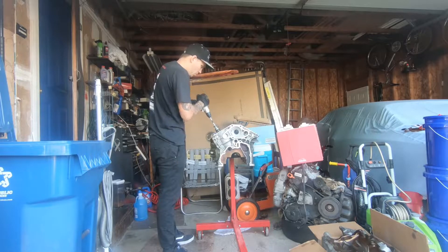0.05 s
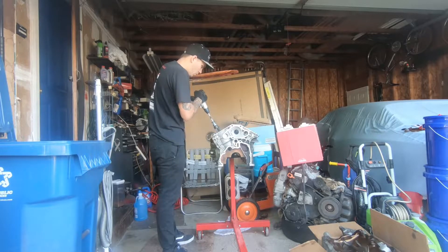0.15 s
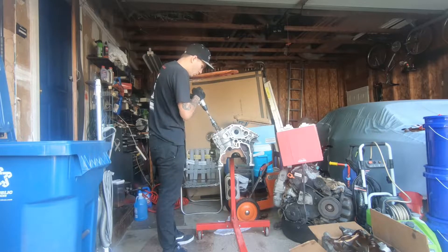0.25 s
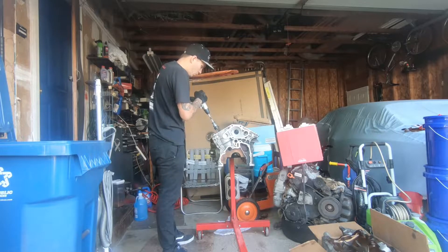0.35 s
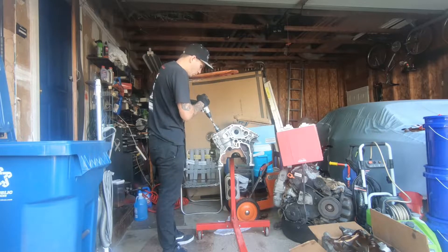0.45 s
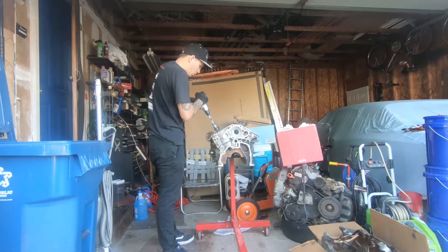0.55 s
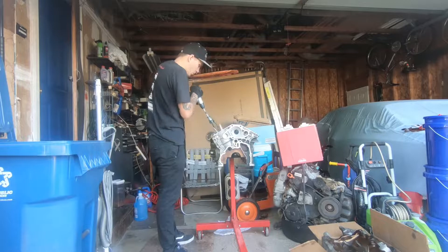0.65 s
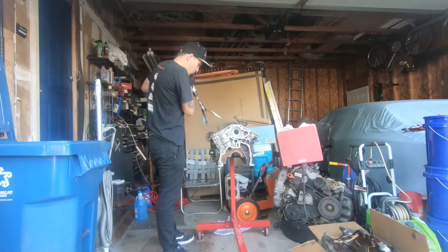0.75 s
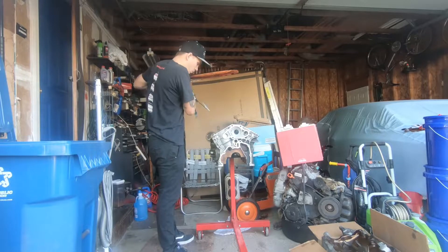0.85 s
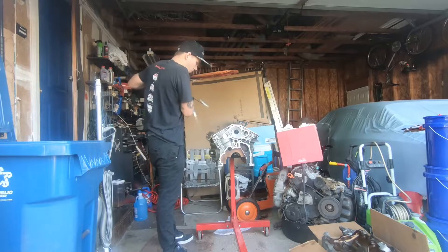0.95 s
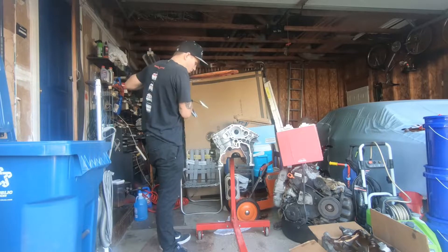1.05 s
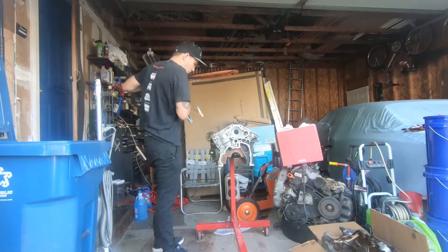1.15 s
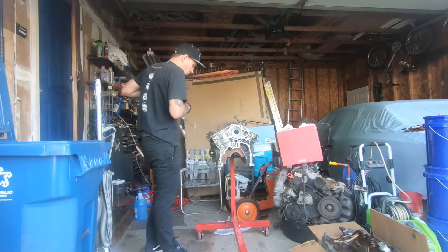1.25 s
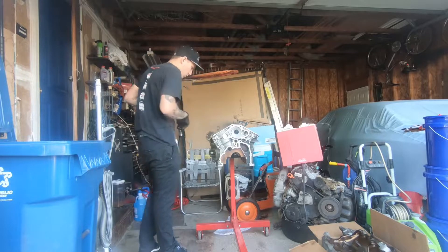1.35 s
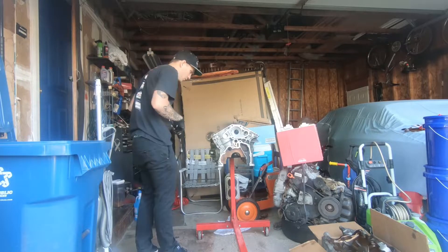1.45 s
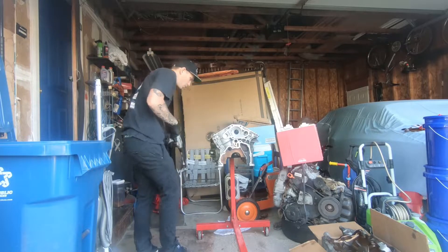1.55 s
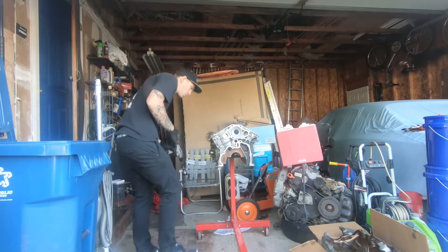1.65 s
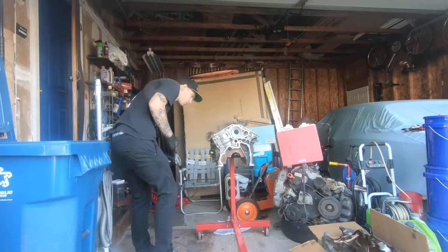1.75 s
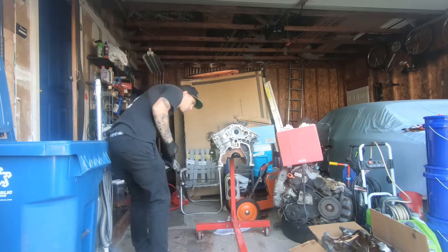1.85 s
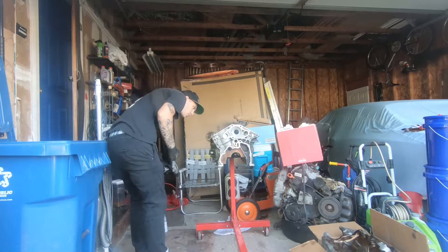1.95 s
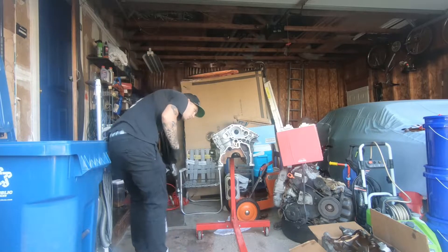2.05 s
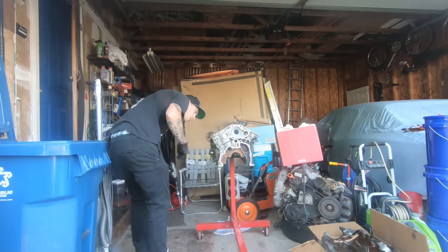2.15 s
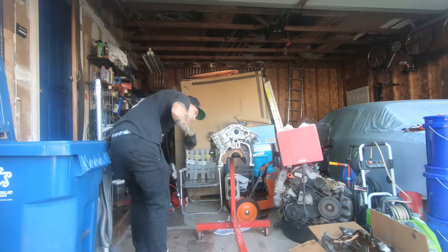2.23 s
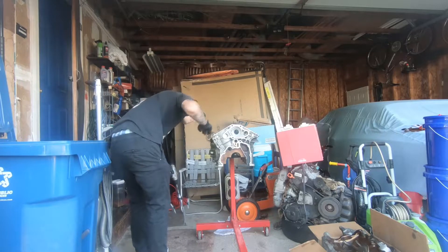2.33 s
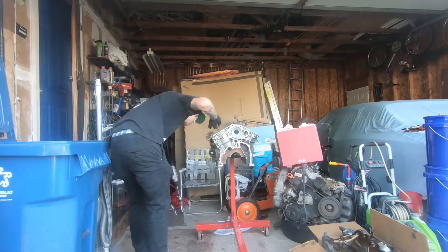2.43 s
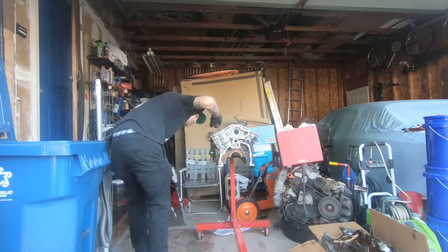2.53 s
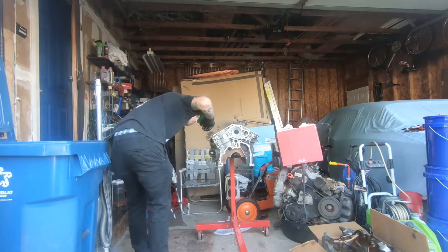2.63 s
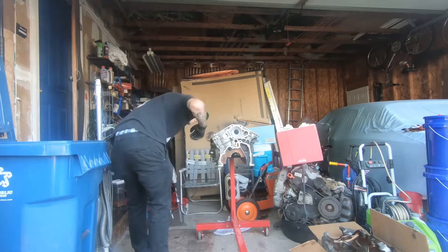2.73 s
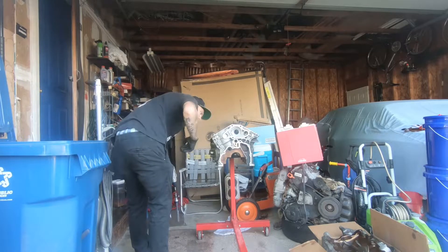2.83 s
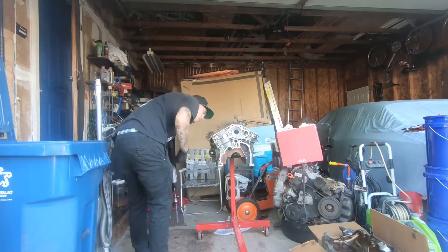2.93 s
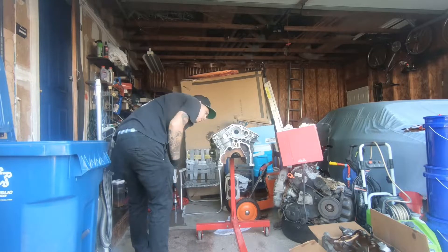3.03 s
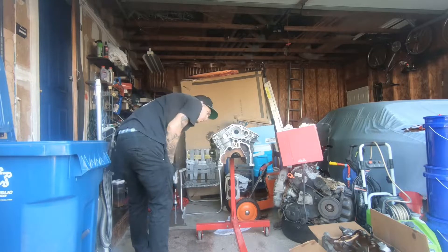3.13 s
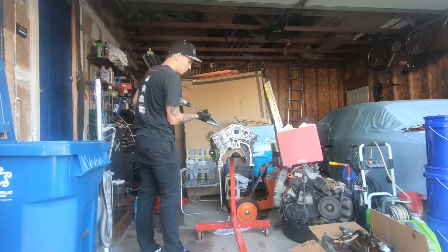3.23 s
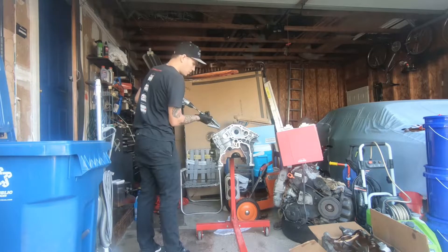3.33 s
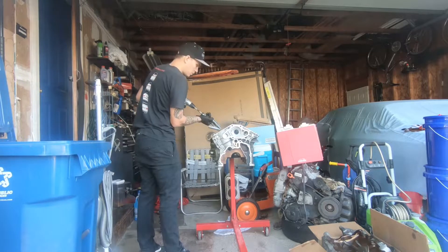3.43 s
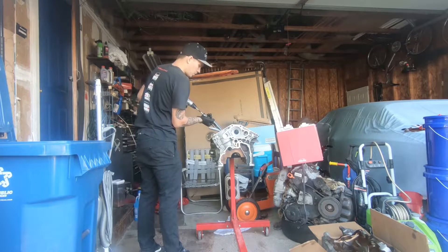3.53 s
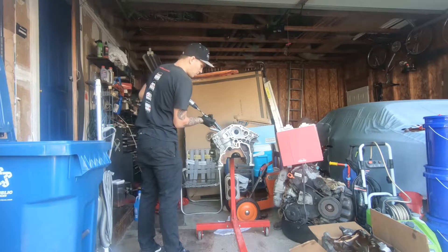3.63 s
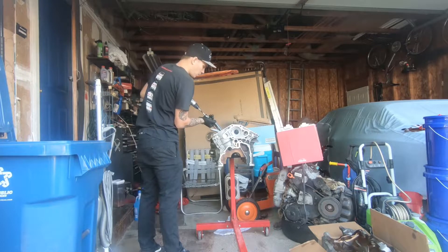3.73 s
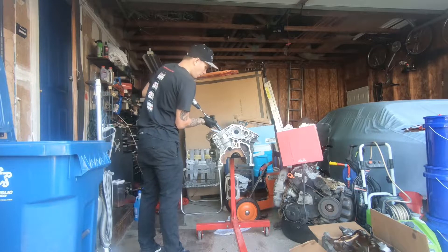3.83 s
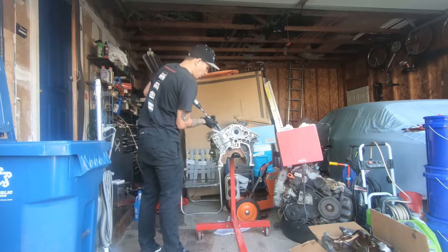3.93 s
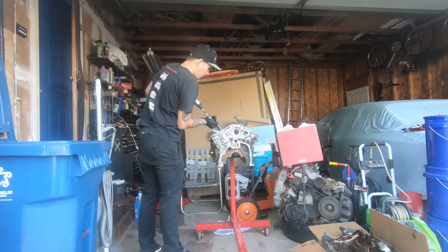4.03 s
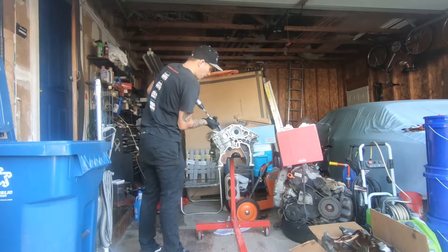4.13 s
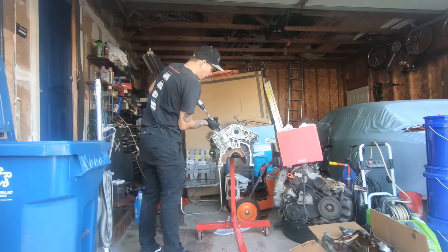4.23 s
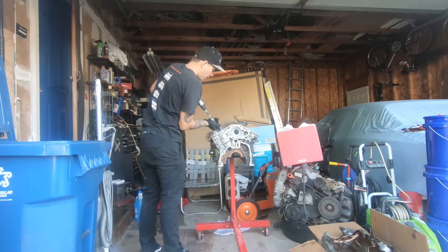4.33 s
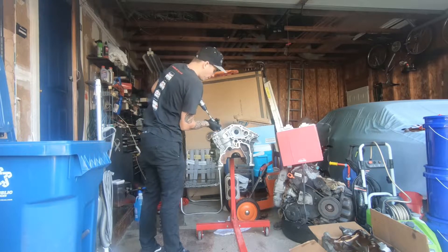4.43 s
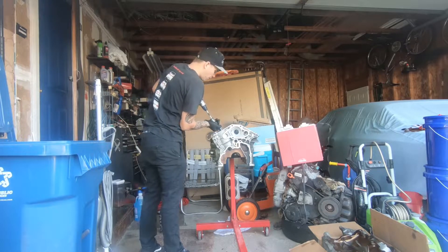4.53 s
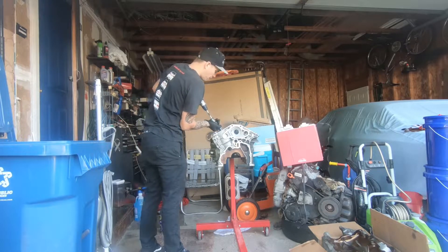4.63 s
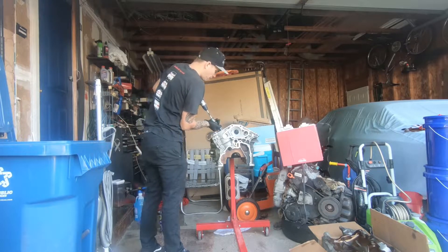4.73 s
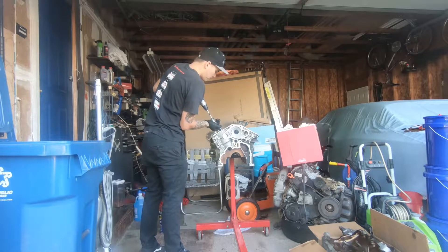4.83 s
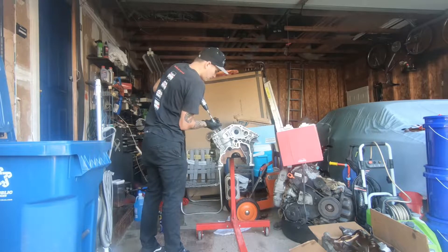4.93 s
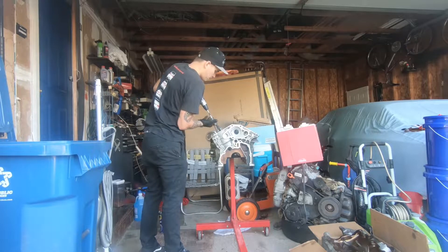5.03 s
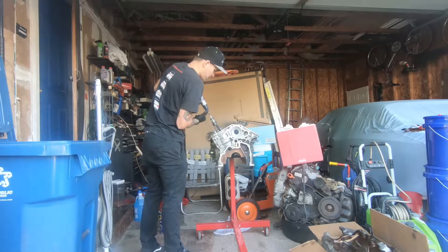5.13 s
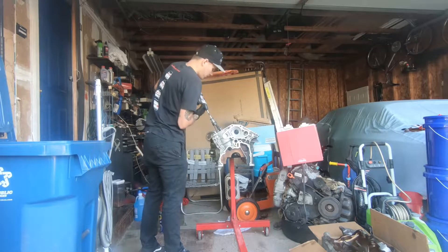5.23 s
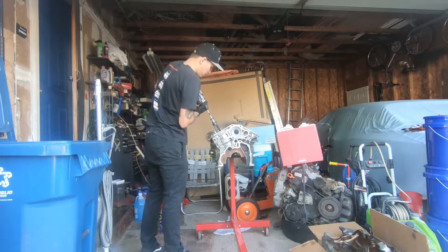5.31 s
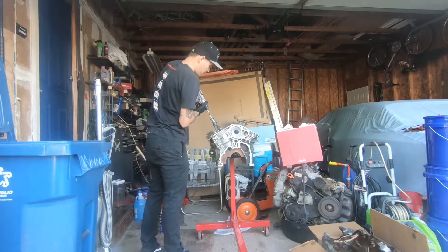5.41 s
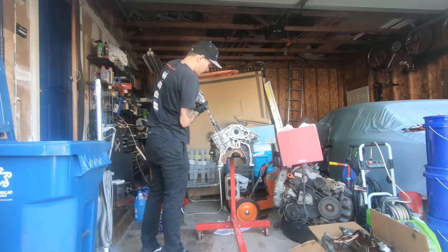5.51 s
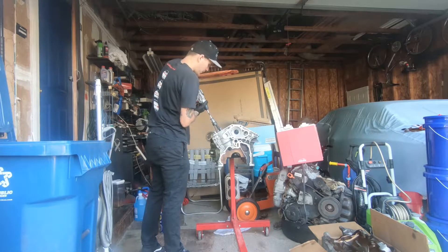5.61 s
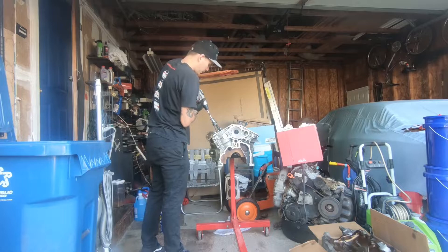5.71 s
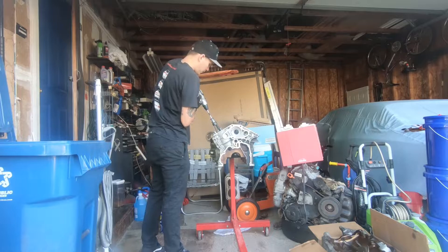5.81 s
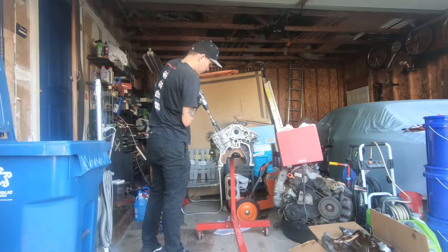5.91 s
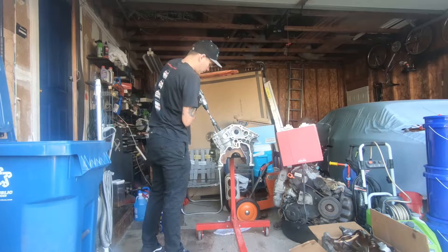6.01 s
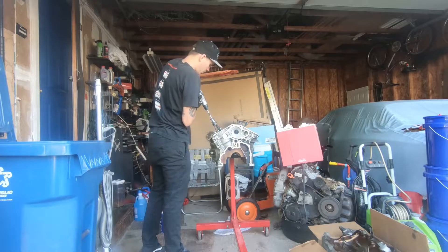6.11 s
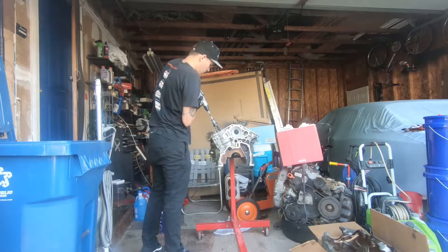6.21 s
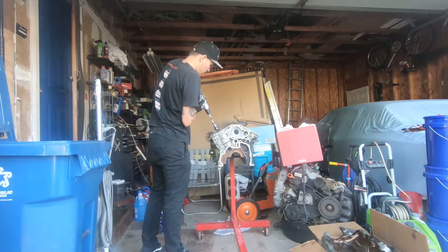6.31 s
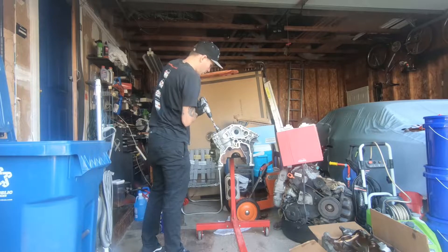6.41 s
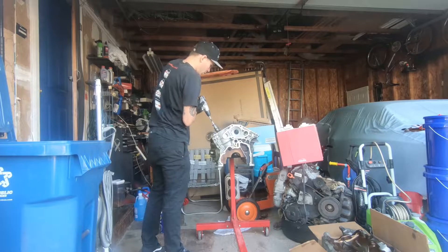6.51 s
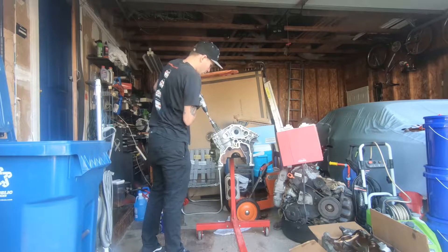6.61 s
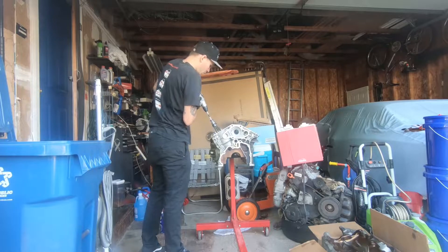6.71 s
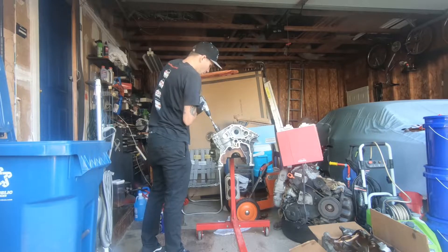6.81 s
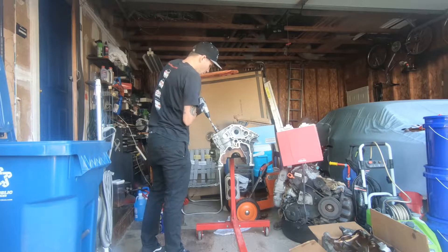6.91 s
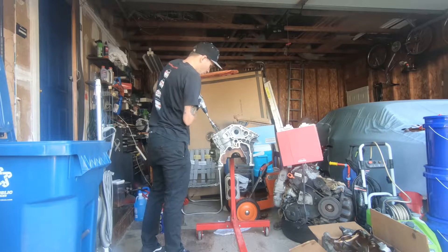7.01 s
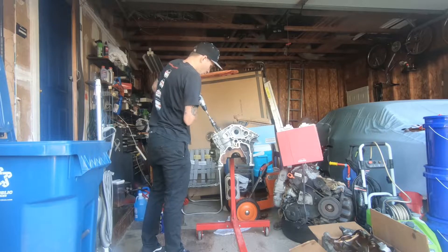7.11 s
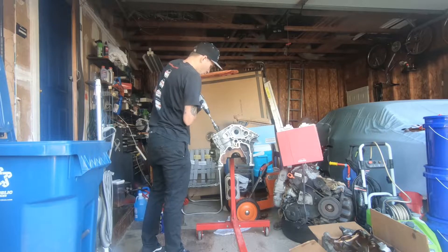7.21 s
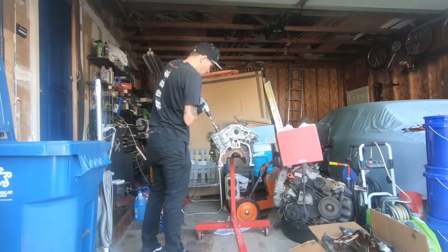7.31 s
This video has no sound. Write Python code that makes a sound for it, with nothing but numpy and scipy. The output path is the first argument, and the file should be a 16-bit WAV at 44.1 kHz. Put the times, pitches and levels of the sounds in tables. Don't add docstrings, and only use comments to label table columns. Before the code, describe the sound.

Heard from the doorway, bright gritty scraping makes an engine block ring, with low wind rumble over it. It ends in a hard metallic clunk and light rattles. A quiet stretch holds cricket chirps, cicada hiss and distant traffic. After an abrupt jump in leaf hiss, the tool knocks the iron, a far engine passes, and drill and stones start again.

```python
import sys
import numpy as np
from scipy import signal
from scipy.fft import rfft, irfft, next_fast_len
from scipy.io import wavfile
from scipy.ndimage import uniform_filter1d

SR = 44100
rng = np.random.default_rng(int(sys.argv[2]) if len(sys.argv) > 2 else 0)


def field_ratio(decibels):
    return 10 ** (np.asarray(decibels, dtype=float) / 20)


def waveform_to_disk(signal):
    frames = np.transpose(np.atleast_2d(signal))
    scaled = np.clip(frames, -1, 1) * 32767
    samples = np.round(scaled).astype(np.int16)
    wavfile.write(sys.argv[1], SR, samples)


N = 324576
TIME = np.arange(N) / SR

# (f/Hz, likeness -1..1)
BORE_LIKENESS = [(300, .3), (700, .35), (1400, .6), (2000, .9), (3300, .92), (4200, .55), (6800, .45),
                 (15000, .3)]


def rms_one(x):
    return x / np.sqrt(np.mean(x ** 2) + 1e-20)


def at_hz(points, hz):
    table_hz, value = np.transpose(points)
    return np.interp(np.log(hz + 1), np.log(table_hz), value)


def drift(rate):
    hop = 40
    r = np.exp(-2 * hop * np.pi * rate / SR)
    noise = rng.standard_normal(N // hop + 2002)
    slow = signal.lfilter([1], [1, -2 * r, r * r], noise)[2000:]
    return np.interp(np.arange(N) / hop, np.arange(len(slow)), rms_one(slow))


def colour(x, spectrum):
    hz = np.arange(N // 2 + 1) * SR / N
    return rms_one(irfft(rfft(x) * field_ratio(at_hz(spectrum, hz)), N))


def spread(mid, side, likeness):
    alike = np.clip(at_hz(likeness, np.arange(N // 2 + 1) * SR / N), -1, 1)
    shared = np.sqrt(1 + alike) * rfft(mid)
    opposed = np.sqrt(1 - alike) * rfft(side)
    return irfft(shared + opposed * [[1], [-1]], N)


def pan(db):
    return field_ratio(np.array([[-db], [db]]))


def ring(clicks, hz, t60):
    r, w = field_ratio(-60 / (t60 * SR)), 2 * np.pi * hz / SR
    return signal.lfilter([0, np.sin(w)], [1, -2 * r * np.cos(w), r * r], clicks + 1e-18)


def band(x, low_hz, high_hz, order=2, rate=SR):
    return signal.sosfilt(signal.butter(order, [low_hz, high_hz], "band", fs=rate, output="sos"), x)


def held(start, end, rise, fall):
    return np.clip((TIME - start) / rise, 0, 1) ** 2 * np.exp(-np.clip(TIME - end, 0, None) / fall)


def bump(middle, width):
    return np.exp(-.5 * ((TIME - middle) / width) ** 2)


def honing():
    # (start/s, end/s, pressure/dB)
    passes = [
        (-.3, .686, -45.5),
        (4.745, 4.8, -51.5),
        (6.137, 7.5, -43),
    ]
    # (t/s, level re pass/dB)
    push = [(0, 2), (.086, -1.5), (.186, 3), (.368, 1), (.41, -1.5), (.5, 2), (.568, -5.5), (.62, 0),
            (.676, 4), (6.31, 0.5), (6.365, -2), (6.5, -0.5), (6.66, 1.5), (6.89, -2), (6.93, 0), (7.04, 2),
            (7.185, 1), (7.3, -1.5)]
    # (f/Hz, width/Hz, level/dB)
    bore = [(910, 25, -14), (1614, 25, -13), (2070, 25, -12), (2157, 20, -9), (2210, 20, -12),
            (2520, 22, -10), (2863, 30, -8), (3100, 30, -8), (3315, 16, -6), (3400, 30, -5), (3461, 24, -5),
            (3500, 200, -9), (3620, 20, -5), (3800, 40, -6), (3880, 200, -11), (3990, 20, -5),
            (4045, 20, -5), (4175, 30, -10), (4560, 20, -13), (4860, 25, -13), (5280, 28, -8),
            (5540, 25, -7), (5670, 35, -2), (5927, 25, -1), (6360, 30, -6), (6680, 30, -10),
            (7270, 30, -10), (8670, 30, -21), (9660, 25, -21), (10700, 25, -22), (12900, 30, -25)]
    # (f/Hz, density/dB)
    grit_spectrum = [(420, -39.5), (700, -13.5), (1000, -24), (1400, -9), (2000, -9.5), (2600, -4),
                     (3400, -5), (4000, -23), (4500, -11), (5200, -6.5), (5900, -0.5), (7200, -5.5),
                     (8200, -15.5), (10900, -17.5), (11500, -23), (12200, -21), (15700, -20.5)]
    touch_s, spin_up_s, lift_s = 0.075, 0.19, 0.013

    push_db = np.interp(TIME, *np.transpose(push))
    touch = spin = 0
    for start, end, db in passes:
        stroke, length = field_ratio(db + push_db), end - start
        touch = touch + stroke * held(start, end, touch_s * min(1, 2 * length), lift_s)
        spin = spin + stroke * held(start, end, spin_up_s * min(1, 10 * length), lift_s)

    sizes = field_ratio(0.77 * np.minimum(rng.exponential(1, (2, N)), 5)) * rng.choice([-1, 1], (2, N))
    contacts_per_s = 6000 * field_ratio(1.5 * drift(25))
    grit = rms_one(sizes * (rng.random((2, N)) < contacts_per_s / SR))
    other = grit[:, ::-1]
    rings = 0
    for hz, width, db in bore:
        swell = field_ratio(db + 2.2 * min(1, width / 30) * drift(5))
        rings = rings + swell * np.sqrt(width) * rms_one(ring(other, hz, 4 / width))
    body = colour(grit, grit_spectrum) + field_ratio(1.5) * rms_one(rings)

    low = field_ratio(-5) * rms_one(band(body, 1600, 4600))
    high = field_ratio(-1) * rms_one(band(body, 4600, 16000))
    rub = field_ratio(-11.5) * rms_one(band(body, 350, 1600))
    rub_gain = field_ratio(-10.5 * held(0.555, 0.717, 0.025, 0.0097))
    touch = touch * field_ratio(1.2 * drift(14))
    spin = spin * field_ratio(1.2 * drift(14))
    scrape = touch * low - spin * high - np.sqrt(touch * spin) * rub_gain * rub
    return spread(*scrape, BORE_LIKENESS) * pan(.5)


def motor():
    # (t/s, turns/Hz)
    rotor = [(0, 309), (.3, 303.3), (.36, 292.5), (.47, 274), (6.3, 288.1), (6.45, 295.4), (6.62, 305.5),
             (7.36, 308.3)]
    # (start/s, end/s)
    running = [
        (-.1, 0.434),
        (6.3, 7.5),
    ]
    multiples_db = [-63.5, -66.5, -64]
    # (start/s, end/s, level/dB)
    labouring = [
        (0.283, .41, -55),
        (6.328, 6.55, -59.5),
        (6.999, 7.5, -67.5),
    ]

    turns_hz = np.interp(TIME, *np.transpose(rotor)) * (1 + 0.0039 * drift(6.1))
    turn = 2 * np.pi * np.cumsum(turns_hz) / SR
    on = sum(held(start, end, 0.051, .02) for start, end in running)
    levels = [on * field_ratio(db) for db in multiples_db]
    for start, end, db in labouring:
        levels[0] = levels[0] + field_ratio(db) * held(start - .02, end, 0.02, .015)
    out = 0
    for k, level in enumerate(levels):
        out = out + field_ratio(-0.5 + 3.8 * drift(26)) * level * np.sin((k + 1) * turn)
    return out


def singing():
    # (start/s, end/s, f/Hz, level/dB)
    sung = [(-.1, .2, 2153, -58), (.16, .38, 1610, -60), (.12, .4, 3618, -52), (.12, .4, 3456, -53),
            (.42, .68, 3790, -54), (6.5, 6.93, 2447, -51), (7.0, 7.5, 2449, -48.5), (6.55, 7.5, 2158, -54),
            (6.55, 7.5, 3398, -51), (6.55, 7.25, 3808, -57), (6.6, 7.5, 1614, -62), (6.55, 7.5, 910, -64),
            (6.23, 6.33, 3420, -48), (6.55, 7.5, 5669, -56), (6.55, 7.5, 5927, -56)]
    out = 0
    for start, end, hz, db in sung:
        level = field_ratio(db + 2.5 * drift(8.9)) * held(start, end, 0.03, 0.029)
        wavering_hz = hz + 5 * drift(11.94)
        out = out + level * np.sin(2 * np.pi * np.cumsum(wavering_hz) / SR)
    return out


def garage(x):
    t60_s, wall_cut_hz = 0.19, 3500
    size = next_fast_len(N + SR)
    w = 2 * np.pi * np.arange(size // 2 + 1) / size
    dull = 1 / (1 + 1j * w * SR / (2 * np.pi * wall_cut_hz))
    loops = []
    for lag in rng.uniform(.012, .04, 16):
        loops.append(field_ratio(-60 * lag / t60_s) * dull * np.exp(-1j * w * round(lag * SR)))
    tails = [sum((-1) ** k * g / (1 - g) for k, g in enumerate(loops[side::2])) for side in (0, 1)]
    return irfft(rfft(x, size) * np.array(tails), size)[:, :N]


def wind():
    # (middle/s, level/dB, left re right/dB, hold/s)
    gusts = [(0.054, -21, 10.5, 0.049), (0.163, -22, 18, 0.043), (0.234, -22, 8, 0.027),
             (0.296, -25.5, 13.5, 0.053), (0.39, -40.5, 3, 0.066), (0.453, -30, 5, 0.039),
             (0.516, -26.5, 15, 0.0098), (0.596, -38, 1, .1), (0.734, -39.5, 3, 0.11),
             (0.835, -39, 13, 0.011), (0.916, -42.5, 3, 0.058), (1.257, -49.5, -12, 0.013),
             (1.334, -41.5, 8, 0.017), (1.717, -48.5, 12.5, 0.02), (1.96, -35.5, 9, 0.00473),
             (2.113, -51, -1.5, 0.067), (2.795, -45, 3.5, 0.019), (2.859, -46.5, 4, 0.0806),
             (2.953, -42, 11, 0.014), (2.989, -36.5, 3.5, 0.0106), (3.013, -25, 15.5, 0.0124),
             (3.047, -30.5, 8, 0.032), (3.095, -38.5, 3.5, 0.027), (3.198, -36, 7, 0.023),
             (4.817, -35, 11, 0.0037), (5.004, -54.5, -6, .1), (5.112, -44, 2, 0.03),
             (5.764, -33, 4, 0.041), (5.813, -32.5, 5, .04), (5.873, -31, 7, 0.018), (6.06, -34, 4, 0.042),
             (6.202, -58, 15, .1), (7.139, -35, 2, .12), (7.36, -37, -11, 0.03)]
    # (t/s, eddies per second/Hz)
    pace = [(0, 88.4), (.3, 78), (.55, 60), (.9, 50), (1.33, 56), (1.7, 42), (1.96, 73), (2.8, 53.2),
            (2.965, 72), (2.985, 118), (3.005, 72), (3.11, 48.5), (4.82, 65), (5.77, 67.7), (6.045, 91.6),
            (6.085, 37.8), (7.1, 68.7), (7.36, 102)]
    rise_db_per_s, fall_db_per_s, breeze_db = 797, 598, -75

    power = field_ratio(2 * (breeze_db + 4.0 * np.array([drift(4.5), drift(4)])))
    for s, db, pan_db, hold in gusts:
        before = np.clip(s - hold / 2 - TIME, 0, 1)
        after = np.clip(TIME - s - hold / 2, 0, 1)
        left = 1 / (1 + field_ratio(-2 * pan_db))
        power += field_ratio(2 * (db - rise_db_per_s * before - fall_db_per_s * after)) * [[left], [1 - left]]

    steps = 64
    white = rng.standard_normal((2, 70000))
    lumps = band(white, .66, 1.6, rate=steps)
    lumps = rms_one(lumps / uniform_filter1d(lumps ** 2, size=70) ** .4)
    large = rms_one(band(white[::-1], .3, .6, rate=steps))
    small = rms_one(band(white, 1.3, 3.2, 3, steps))
    lumps = lumps + .12 * lumps ** 2 + field_ratio(-15) * large + field_ratio(-27) * small
    lumps = band(lumps, .25, 2.9, 3, steps)

    per_s = np.interp(TIME, *np.transpose(pace)) * (1 + .06 * drift(6.06))
    at = 200 + steps * np.cumsum(per_s) / SR
    eddies = [rms_one(np.interp(at, np.arange(len(v)), v)) for v in lumps]
    return 2 * np.sqrt(power) * eddies


def yard():
    # (f/Hz, density/dB)
    early = [(210, -39), (350, -24), (379, -4), (535, -12), (646, -3.5), (780, -4.5), (1270, -14),
             (1330, -11.5), (2310, -21.5), (3370, -16), (4690, -18.5), (6830, -9.5), (8380, -17),
             (8930, -29.5), (15000, -38.5)]
    # (f/Hz, density/dB)
    late = [(210, -26), (350, -3), (579, -3.5), (780, 4), (928, -3.5), (3210, -4), (4910, -6), (6030, -1.5),
            (7510, -1.5), (8000, -6.5), (9070, -21), (12600, -30.5), (15000, -35)]
    # (f/Hz, density/dB)
    traffic_spectrum = [(12, -36), (20, 0.5), (38, -6), (59, -16.5), (103, -17), (134, -5), (157, 2.5),
                        (304, -13.5), (422, -25), (450, -34), (580, -47.5), (990, -120)]
    # (f/Hz, density/dB)
    cicada_spectrum = [(2940, -36), (5000, -4), (5220, -30), (5570, -17.5), (6830, 5.5), (7540, 6),
                       (8460, -12), (8880, -27), (9500, -16.5), (12400, -55.5), (20900, -120)]
    # (f/Hz, likeness -1..1)
    yard_likeness = [(60, 0.87), (130, -0.75), (290, 0.25), (640, -0.72), (1410, -0.51), (3100, 0.61),
                     (6820, -0.14), (15000, -0.19)]
    change_s = 3.228

    changed = np.clip((TIME - change_s) / 0.0023, 0, 1)
    air = rng.standard_normal((2, N))
    late_db = -58.5 - 2.15 * np.exp(-np.abs(TIME - change_s) / .6)
    leaves = (1 - changed) * field_ratio(-65.5) * colour(air, early) + changed * field_ratio(late_db) * colour(air, late)
    leaves = leaves * field_ratio(.5 * drift(1.34))
    traffic_db = -57 - 4.5 * bump(1.65, 0.55) + 0.91 * drift(11.0)
    traffic = field_ratio(traffic_db) * colour(rng.standard_normal((2, N)), traffic_spectrum)
    cicada_db = (1 - changed) * -67.5 + changed * -67 + 1.2 * drift(30.2)
    cicadas = field_ratio(cicada_db) * colour(rng.standard_normal((2, N)), cicada_spectrum)
    return spread(*(leaves + traffic), yard_likeness) + cicadas


def knocks(events, modes, crack, ring_db, crack_db):
    rattle = np.zeros(N)
    at = [round(event[0] * SR) for event in events]
    after = np.arange(20000) / SR
    for start, (_, db, length) in zip(at, events):
        decay = np.exp(-after / max(length, .001)) + 0.32 * np.exp(-after / 0.0032)
        rattle[start:start + len(after)] += field_ratio(db) * decay * np.minimum(1, after / 0.0016)
    out = field_ratio(crack_db + drift(61)) * rattle * colour(rng.standard_normal((2, N)), crack)
    for hz, db, t60 in modes:
        blows = np.zeros((2, N))
        blows[:, at] = field_ratio(np.array(events)[:, 1] + db + ring_db) * rng.choice([-1, 1], (2, 1))
        out += ring(blows, hz, t60)
    return out


def seat_knocks():
    # (t/s, peak/dB, rattle length/s)
    events = [
        (0.4607, -28.5, 0.026),
        (4.325, -54, 0.011),
        (4.7533, -52, 0.019),
        (4.805, -26, 0.008),
        (4.812, -30, 0.016),
        (4.8245, -29.5, 0.018),
        (4.8285, -20, 0.019),
        (4.839, -34, 0.072),
    ]
    # (f/Hz, level/dB, t60/s)
    modes = [(1615, -12, 0.27), (2089, -19, 0.34), (2400, -4, .1), (2492, -11, .2), (2575, -6, 0.2),
             (2640, -3, .08), (3198, -9, 0.19), (3316, -11, 0.35), (3410, -3, .22), (3470, 5, 0.17),
             (3530, -4, .14), (3808, -5, 0.13), (4167, -11, 0.19), (4457, -8, 0.18), (4748, -9, 0.21),
             (5010, -13, 0.23), (5534, -7, 0.14), (5900, -11, .22), (6306, -9, 0.17), (6853, -10, 0.21),
             (6993, -7, 0.14), (7607, -15, 0.26)]
    # (f/Hz, density/dB)
    crack = [(350, -56), (600, -37), (1470, -36), (1580, -15), (2220, -11.5), (2540, -2), (3030, -11.5),
             (3430, -2.5), (6970, -10.5), (15600, -42)]
    return knocks(events, modes, crack, -13.0, -9.0)


def pops():
    # (t/s, level/dB, first f/Hz, last f/Hz, time/s)
    air_pops = [
        (0.513, -37, 850, 461, 0.014),
        (6.222, -44.5, 478, 740, 0.0197),
    ]
    out = 0
    for s, db, first_hz, last_hz, time in air_pops:
        after = np.clip(TIME - s, 0, 1) / time
        hz = last_hz + (first_hz - last_hz) * np.exp(-.8 * after)
        puff = after * np.exp(.5 - .5 * after ** 2)
        out = out + field_ratio(db - 8.0) * puff * np.sin(2 * np.pi * np.cumsum(hz) / SR)
    return out


def rim_graze():
    # (t/s, peak/dB, rattle length/s)
    events = [
        (0.6848, -17.5, 0.024),
    ]
    # (f/Hz, level/dB, t60/s)
    modes = [(5400, -8, .15), (5679, -3, .25), (6100, -8, .15), (6950, -6, .1)]
    # (f/Hz, density/dB)
    crack = [(590, -60), (1000, -17.5), (2070, -12.5), (3600, -2), (4500, -7.5), (5700, -1), (7100, 2),
             (8610, -14.5), (15000, -40)]
    return knocks(events, modes, crack, -16.5, -12)


def clunk_out():
    # (t/s, peak/dB, rattle length/s)
    events = [
        (0.6905, -15, 0.043),
    ]
    # (f/Hz, level/dB, t60/s)
    modes = [(1410, -18, 0.44), (1615, -12, 0.16), (2277, -11, 0.2), (2552, -8, 0.2), (2810, -17, .21),
             (2864, -20, 0.4), (3022, -16, 0.32), (3101, -14, 0.3), (3311, -6, 0.36), (3397, -8, 0.26),
             (3461, -2, 0.3), (3499, -5, 0.3), (3618, -5, 0.36), (3788, .5, 0.34), (3897, -11, .3),
             (4188, -17, 0.33), (4753, -12, 0.24), (4942, -13, .23), (5679, -8, 0.25), (6584, -20, 0.32),
             (6998, -15, 0.33), (7537, -26, 0.68)]
    # (f/Hz, density/dB)
    crack = [(350, -60), (600, -25.5), (1940, -24), (2190, -10), (2680, -13.5), (3530, -4.5), (4380, -16),
             (7060, -16.5), (15600, -37.5)]
    return knocks(events, modes, crack, -12.5, -12.5)


def shelf_knocks():
    # (t/s, peak/dB, rattle length/s)
    events = [
        (0.7771, -26, 0.015),
        (.796, -37, .015),
        (0.8144, -41, 0.029),
        (.84, -51, 0.031),
        (1.0051, -41, 0.044),
        (1.051, -38, 0.021),
        (1.078, -49, 0.046),
    ]
    # (f/Hz, level/dB, t60/s)
    modes = [(3400, -10, .1), (4450, -3, .13), (4620, 1, .15), (4850, -1, .12), (6950, -6, .08),
             (7500, -10, .1)]
    # (f/Hz, density/dB)
    crack = [(590, -66), (1000, -19), (1490, -16.5), (1840, -3.5), (2070, -18), (3600, 0), (3980, -9),
             (4350, 2), (4700, 2), (5300, -5), (6100, 0.5), (7100, 5.5), (8610, -13.5), (15000, -44)]
    return knocks(events, modes, crack, -18, -12)


def sway():
    # (middle/s, spread/s, level/dB)
    pushes = [(1.9, .35, -52), (2.7, .3, -55), (3.2, .12, -47.5), (5.85, 0.095, -45), (6.2, .12, -46),
              (7.2, .12, -44)]
    level = sum(field_ratio(db) * bump(s, width) for s, width, db in pushes)
    return level * rms_one(band(rng.standard_normal((2, N)), 23, 40))


def insects():
    # (t/s, peak/dB)
    chirps = [(1.206, -69), (1.57, -70.5), (2.166, -71.5), (2.4672, -68), (2.772, -70), (3.0842, -70),
              (3.4994, -84), (4.3996, -68)]
    # (middle/s, spread/s, level/dB)
    ticking = [(1.2, .5, -76), (2.6, 0.6, -74), (4.4, .6, -72), (5.5, .45, -71)]

    gate = sum(field_ratio(db) * bump(s + .002 + 0.036 * k, 0.016) for s, db in chirps for k in range(3))
    wings = ring(ring(rng.standard_normal(N), 4480, .005), 4720, .005)
    cricket = field_ratio(-3) * gate * rms_one(wings)
    beat = np.cumsum(18.2 * (1 + 0.0092 * drift(2.0))) / SR + 0.19
    rasp = rms_one(ring(rng.standard_normal(N), 7680, 0.0077)) + np.sin(2 * np.pi * 8170 * TIME)
    ticks = rms_one(np.exp(2.1 * np.cos(2 * np.pi * beat)) * rasp)
    bouts = sum(field_ratio(db - 2.5) * bump(s, width) for s, width, db in ticking)
    return cricket * pan(2) + bouts * ticks * pan(-1)


def sole_scuff():
    # start/s, end/s, level/dB
    drag = (1.737, 1.925, -59)
    # (f/Hz, density/dB)
    sole = [(260, -1), (450, 5.5), (559, 3), (643, -4), (1080, 0), (1250, -5), (3720, -6.5), (6000, -11),
            (7800, -47), (13200, -120)]
    start, end, db = drag
    level = held(start, end, 0.084, 0.067) * field_ratio(db + 1.1 * drift(40.0))
    return level * spread(*colour(rng.standard_normal((2, N)), sole), BORE_LIKENESS)


def taps():
    # (t/s, peak/dB, f/Hz, t60/s)
    touches = [
        (1.855, -40, 230, .1),
        (5.242, -50, 6150, .12),
    ]
    out = 0
    for s, db, hz, t60 in touches:
        blow = signal.lfilter([.05], [1, -.95], np.arange(N) == round(s * SR))
        out = out + field_ratio(db) * ring(blow * max(1, hz / 400), hz, t60)
    return out


def passing_engine():
    return field_ratio(-58.0) * bump(5.15, 0.36) * rms_one(ring(rng.standard_normal((2, N)), 297, 0.082))


def slip_knocks():
    # (t/s, peak/dB, rattle length/s)
    events = [
        (6.408, -28.5, 0.022),
        (6.4275, -30, 0.023),
        (6.441, -39, 0.014),
        (6.456, -35.5, 0.035),
    ]
    # (f/Hz, level/dB, t60/s)
    modes = [(2065, 1, 0.29), (2270, 5, 0.12), (2926, 9, 0.11), (3250, 3, 0.14), (3940, -18, .12),
             (5030, 3, 0.095), (5170, -7, 0.094), (5780, 12, 0.13), (6160, 12, 0.062), (6900, 8, 0.15)]
    # (f/Hz, density/dB)
    crack = [(350, -31.5), (900, -20.5), (1600, -12), (2200, -10.5), (3300, -5), (4100, -8), (6500, -4),
             (15600, -45)]
    return knocks(events, modes, crack, -17.0, -2.5)


def scene():
    # (f/Hz, likeness -1..1)
    knock_likeness = [(600, .3), (1400, .55), (2000, .9), (3600, .92), (4500, .5), (6800, .35),
                      (15000, .45)]
    hits = seat_knocks() + rim_graze() + clunk_out() + shelf_knocks() + slip_knocks()
    tones = motor() + singing() + pops() + taps()
    near = (spread(*hits, knock_likeness) + tones) * pan(1.2)
    echo = field_ratio(-12.5) * garage(hits[0] + tones)
    outdoors = wind() + yard() + sway() + insects() + passing_engine()
    return honing() + near + echo + sole_scuff() + outdoors


def top_cut(x):
    return signal.sosfilt(signal.butter(12, 15710, fs=SR, output="sos"), x)


def record(dry):
    low_pass = signal.cheby2(10, 50, 16200, fs=SR, output="sos")
    mix = signal.sosfiltfilt(low_pass, dry)
    return top_cut(mix)


dry = scene()
out = record(dry)
waveform_to_disk(out)
```